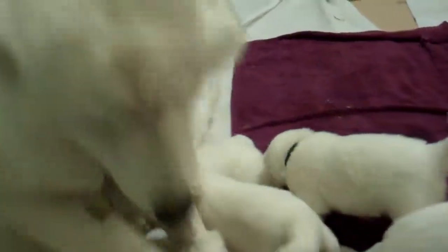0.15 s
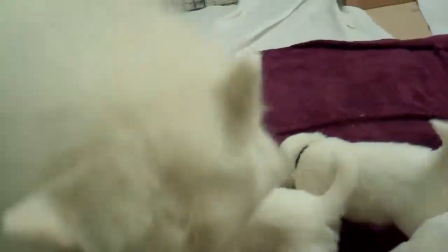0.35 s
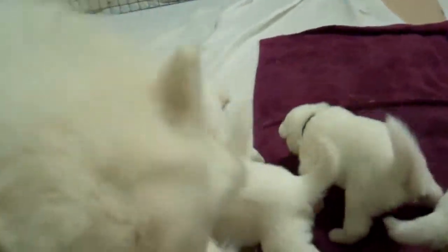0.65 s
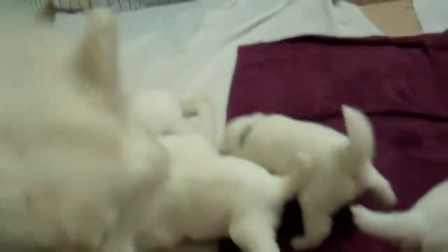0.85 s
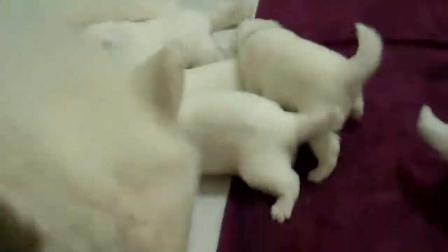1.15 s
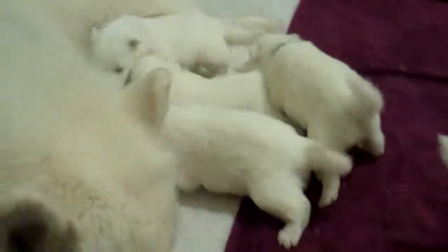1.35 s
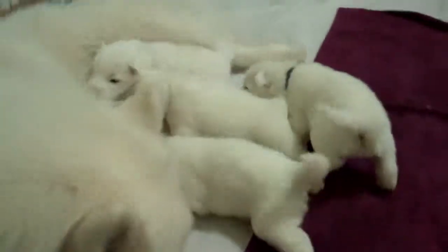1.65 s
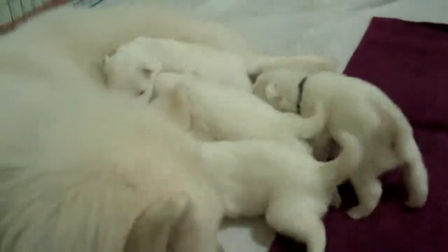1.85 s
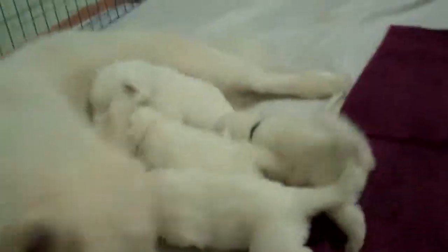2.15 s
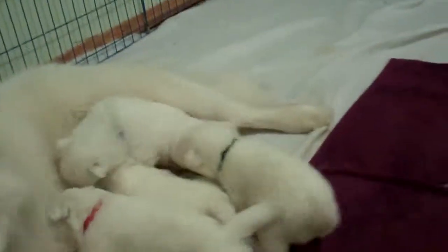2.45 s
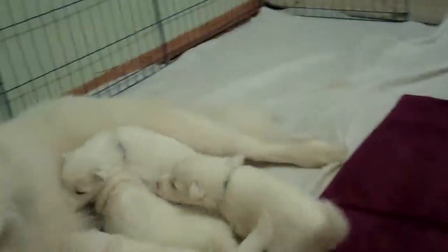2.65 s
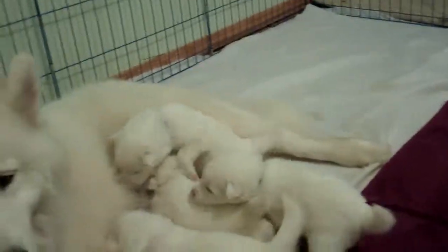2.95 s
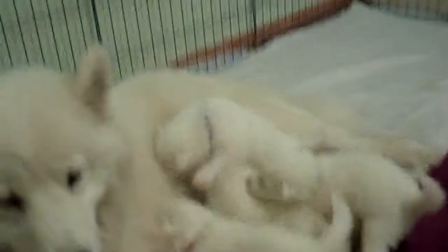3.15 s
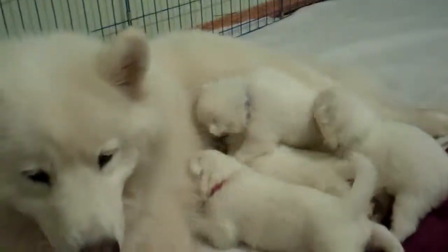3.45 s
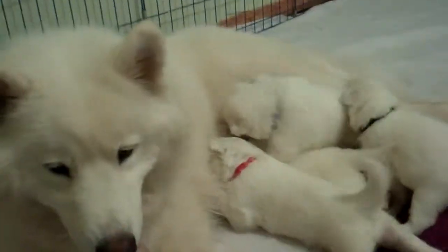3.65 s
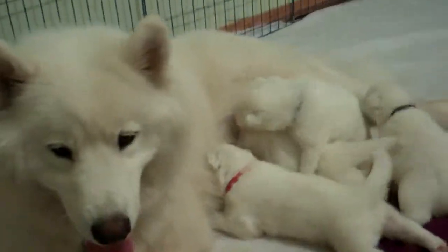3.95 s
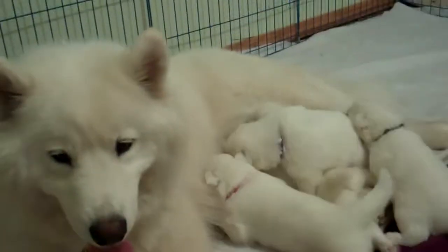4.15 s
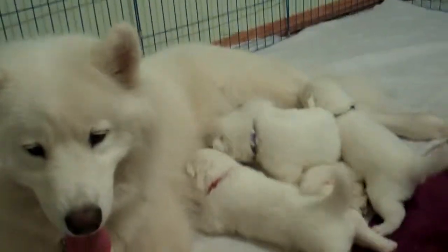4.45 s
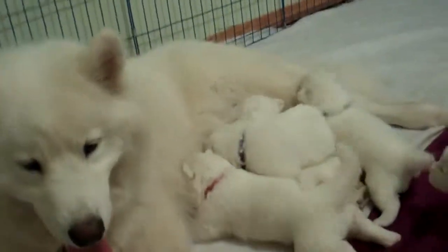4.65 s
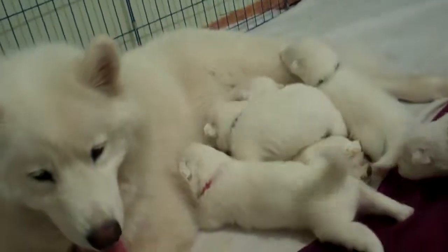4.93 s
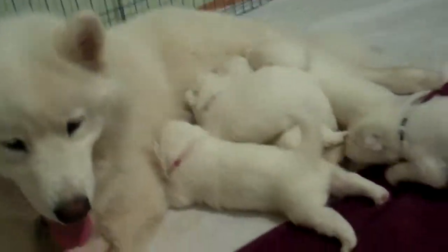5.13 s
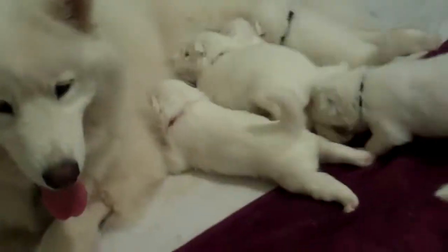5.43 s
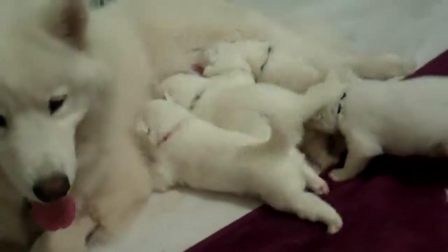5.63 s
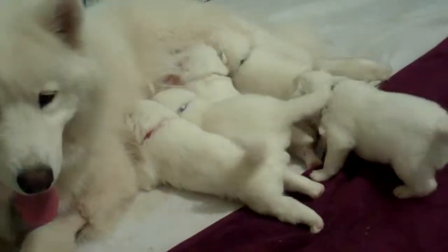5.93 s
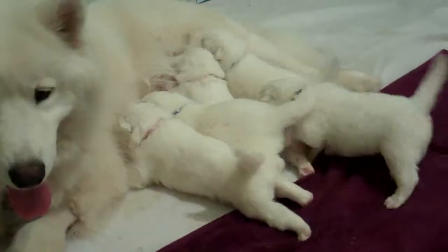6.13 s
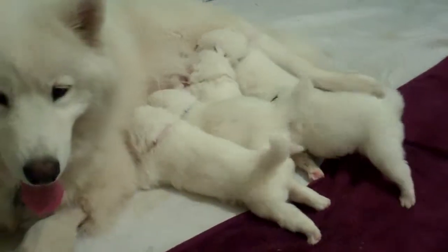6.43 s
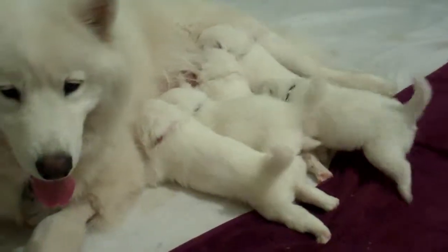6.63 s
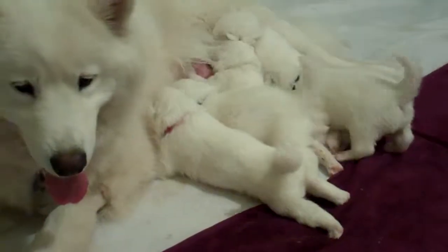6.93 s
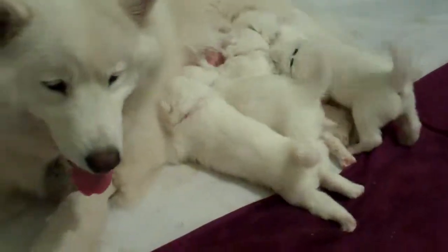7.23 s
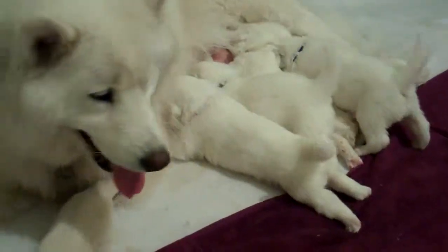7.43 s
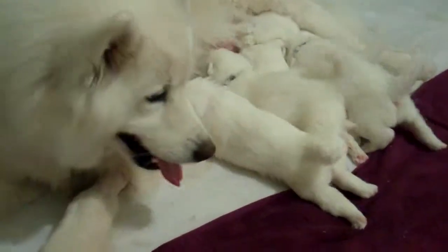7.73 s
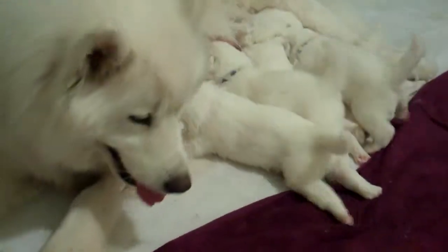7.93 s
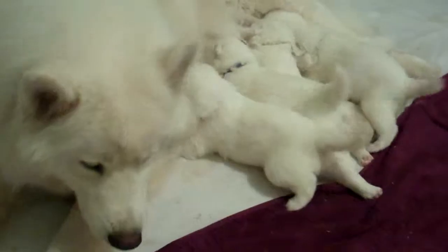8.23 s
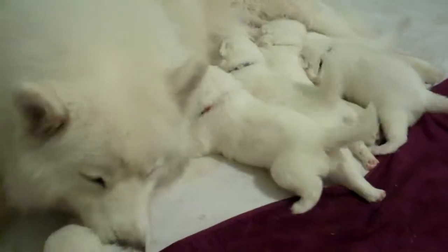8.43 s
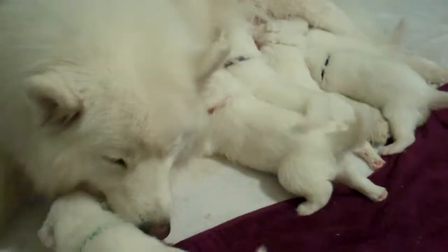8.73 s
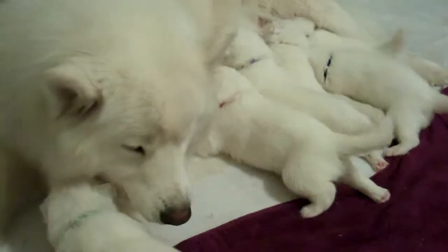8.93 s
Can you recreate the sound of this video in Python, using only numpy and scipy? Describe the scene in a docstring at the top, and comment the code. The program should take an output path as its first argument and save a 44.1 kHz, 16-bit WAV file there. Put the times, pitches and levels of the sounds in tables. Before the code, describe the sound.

A sharp puppy squeal opens, then a soft whimper and a louder, cracking yelp. The middle quietens to bedding rustles, small low grunts, claw ticks and a few metal clinks. After a bump near five seconds, a run of arched squeals follows, then gentle whimpers. Close microphone in a small, bare, slightly echoing room with steady hiss.

```python
"""A puppy's squeal bursts out at once, over a faint stir of bedding and the steady air of a small, bare room.
One pup squeals in quick rising and falling arches; another yelps shrilly; others whimper and grunt.
Voices are harmonic series on pitch arches filtered by a throat; noses whistle as gliding sines.
Bedding, taps and bumps are shaped noise; metal clinks are decaying modes struck by clicks.
A room adds echoes and a diffuse tail, and gain control ducks the loudest cries."""
import sys
import numpy as np
from scipy import signal
from scipy.fft import rfft, irfft, next_fast_len
from scipy.io import wavfile
from scipy.ndimage import uniform_filter1d, map_coordinates

SR = 44100
rng = np.random.default_rng(int(sys.argv[2]) if len(sys.argv) > 2 else 0)


def master(y):
    """Save y as 16-bit WAV."""
    cut = np.clip(np.atleast_2d(y).T, -1, 1)
    pcm = np.round(cut * 32767)  # scale
    wavfile.write(sys.argv[1], SR, pcm.astype(np.int16))


N = 400428
EDGE_HZ = 14350  # upper band limit


def amp(db):
    """Logarithmic level: decibels become an amplitude ratio."""
    return 10 ** (np.asarray(db) / 20)


def unit(x):
    """Power normalisation: scales to rms 1."""
    return x / np.sqrt(np.mean(x ** 2) + 1e-20)


def read(points, hz):
    """Logarithmic frequency scale: interpolates a table along it."""
    f, value = np.transpose(points)
    return np.interp(np.log(hz + 1), np.log(np.abs(f) + 1), value)


def add(mix, s, sound):
    """Superposition: adds a sound to the mix in place, from a time in seconds."""
    part = mix[max(round(s * SR), 0):][:len(sound)]
    part += sound[:len(part)]


def colour(x, points, tilt_db=0):
    """Linear filtering: weights the spectrum by a table and a tilt per octave, then sets rms to 1."""
    hz = np.fft.rfftfreq(len(x), 1 / SR)
    gain = amp(read(points, hz) + tilt_db * np.log2(1 + hz / 500))
    return unit(irfft(rfft(x) * gain, len(x)))


def wander(size, hz):
    """Band-limited random motion: a smooth curve through random knots, two per cycle of the top rate."""
    knots = rng.standard_normal(size // 8 + 4)
    return map_coordinates(knots, [np.arange(size) * 2 * hz / SR], order=2, mode="wrap")


def delay(x, s):
    """Linear phase: a phase slope delays by any fraction of a sample."""
    size = next_fast_len(N + SR // 4)
    hz = np.fft.rfftfreq(size, 1 / SR)
    return irfft(rfft(x, size) * np.exp(-2j * np.pi * hz * s), size)[:N]


# Coherence of a diffuse field at two ports: (f/Hz, left-right likeness 0-1)
LIKENESS = [(60, 1), (130, 0.93), (290, 0.93), (640, 0.86), (1410, 0.66), (2150, 0.045), (15000, 0.018)]


def pair(a, b):
    """Spatial coherence: mixes two unrelated signals into a diffuse field at two close microphone ports."""
    same = np.clip(read(LIKENESS, np.fft.rfftfreq(len(a), 1 / SR)), 0, 1)
    other = same * rfft(a) + np.sqrt(1 - same ** 2) * rfft(b)
    return np.array([a, irfft(other, len(a))])


ARCH_ROUND = 3.5  # how long the pitch lingers at the top before it drops
STRAIN_AT = 0.23  # share of the fall at which the voice is harshest
OPEN_UNTIL = 0.62  # the resonance starts to move this share of the way from full level to top pitch
RELEASE_S = 0.018  # length of the quick final fade


def cry(row, swell, sink_db, hold, pure_db, thin_db, muffle_db, clean, mouth_hz, closing):
    """Vocal effort: one arch governs pitch, level, overtones, roughness and resonance together."""
    (s, rise, fall, start_hz, top_hz, end_hz, steepness, onset_db, attack, db,
     rise_db, fall_db, rough, ring_hz) = row
    length, strain = rise + fall, rise + STRAIN_AT * fall
    t = np.arange(0, length, 20 / SR)

    up, down = np.clip(t / rise, 0, 1), np.clip((t - rise) / fall, 0, 1)
    rising = start_hz + (top_hz - start_hz) * (1 - (1 - up) ** steepness) ** 2
    falling = end_hz + (top_hz - end_hz) * (1 - down ** (ARCH_ROUND / steepness)) ** 1.8
    hz = np.where(t < rise, rising, falling)

    level_db = db + (onset_db - db) * np.interp(t, [0, attack], [1, 0]) ** swell
    level_db -= sink_db * np.interp(t, [attack, length], [0, 1]) ** hold
    level_db -= np.interp(t, [length - RELEASE_S, length], [0, 10])

    # overtones: onset, full rise, top, greatest strain, shutting mouth
    soonest = min(attack, rise)
    overtone_db = np.interp(t, [0, soonest * 0.73, rise, strain, length],
                            [rise_db - pure_db, rise_db, rise_db - thin_db, fall_db, fall_db - muffle_db])
    roughness = rough * np.interp(t, [rise, strain], [clean, 1])
    widest = soonest * (1 - OPEN_UNTIL) + rise * OPEN_UNTIL
    log_focus = np.interp(t, [widest, strain, length], np.log([ring_hz, mouth_hz, mouth_hz * closing]))
    # course columns: t/s, f/Hz, level/dB, overtones/dB, roughness, resonance f/Hz
    return np.transpose([s + t, hz, level_db, overtone_db, roughness, np.exp(log_focus)])


def voice(course, throat, focus_db, jitter, rasp, flutter_db):
    """Source and filter: vocal-fold partials and pulsed air pass a throat; roughness shakes the folds."""
    s, *columns = np.transpose(course)
    t = np.arange(s[0], s[-1], 1 / SR)
    smooth = (uniform_filter1d(np.interp(t, s, c), SR // 160) for c in columns)
    hz, level_db, overtone_db, rough, focus_hz = smooth
    rough = np.clip(rough, 0, 1)
    phase = 2 * np.pi * np.cumsum(hz * (1 + jitter * rough * wander(len(t), 300))) / SR

    k = np.arange(1, 25)[:, None]  # partial number
    # the mouth lifts the partials near its resonance
    focus = focus_db * np.exp(-(np.log(k * hz / focus_hz) / 0.18) ** 2)
    partials = amp(read(throat, k * hz) + focus + overtone_db * (k > 1)) * (k * hz < EDGE_HZ)
    partials /= np.sqrt((partials ** 2).sum(0) / 2)
    # the throat spreads each pulse in time
    folds = (partials * np.cos(k * phase - k ** 2 / 2)).sum(0)
    # strong and weak cycles alternate under strain
    folds *= 1 + rough * wander(len(t), 149.6) * np.cos(phase / 2)

    air = colour(rng.standard_normal(len(t)) * (1 + np.cos(phase)), throat)
    sound = (folds + rasp * rough * air) / np.sqrt(1 + (rasp * rough) ** 2)
    fade = np.clip(np.minimum(t - t[0], t[-1] - t) / 0.0029, 0, 1)
    return s[0], sound * fade * amp(level_db + flutter_db * wander(len(t), 59.4))


# Pitch arches of open-mouthed squeals: (t/s, rise/s, fall/s, start f/Hz, top f/Hz, end f/Hz, steepness,
#   onset level/dB, attack/s, full level/dB, rise overtones/dB, fall overtones/dB, roughness 0-1, resonance f/Hz)
# Steepness 1.5 is a gentle bell, 5 a leap to a long top and a sudden drop. Levels are before the room.
SQUEALS = [ (0, .043, 0.083, 926, 1412, 599, 1.71, -33.5, 0.044, -15, -1.5, 9.5, 0.44, 2390),
           (2.674, .012, 0.056, 906, 900, 820, 2, -50, 0.018, -48, -1, 3, 0.56, 2900),
           (2.975, .01, .06, 874, 872, 800, 1.8, -53, .02, -52, 14, 14, .55, 3400),
           (3.28, 0.011, 0.061, 914, 900, 835, 1.9, -56, 0.028, -55, 16, 16, 0.5, 3500),
           (5.772, 0.081, 0.11, 782, 1405, 511, 2.29, -26, 0.095, -15.5, -14.5, 6, 0.2, 10900),
           (6.352, .106, .095, 922, 1596, 597, 3.8, -38.5, 0.047, -14.5, -0.5, 10.5, 0.09, 8200),
           (6.713, 0.13, 0.096, 891, 1696, 690, 4.35, -37.5, .045, -16.5, 0, 12, 0.05, 8000),
           (7.119, .084, .16, 919.4, 1559, 493, 2.69, -29.5, 0.038, -17.5, 3.5, 8, 0.41, 7200)]
# Open-mouth throat response: (f/Hz, level/dB)
OPEN_MOUTH = [(130, -46), (300, -47), (700, -2), (1300, -3), (1800, 1), (2450, -4.5), (3000, -19),
              (3500, -22.5), (4700, -6.5), (6100, -17.5), (8200, -13), (10500, -25), (12500, -27),
              (14500, -73)]


def squeals():
    """Spectral growth under strain: most open-mouthed cries gain overtones and harshness as they fall."""
    out = np.zeros(N)
    for row in SQUEALS:
        course = cry(row, swell=1.1, sink_db=16.5, hold=1.0, pure_db=18, thin_db=1.5, muffle_db=22.5,
                     clean=0.25, mouth_hz=2300, closing=0.79)
        add(out, *voice(course, OPEN_MOUTH, focus_db=4.0, jitter=0.113, rasp=0.29, flutter_db=4))
    return out


# Spectrum of the room's air: (f/Hz, level/dB)
AIR = [(15, -43), (25, -27), (59, -3), (117, -4), (170, -7), (267, -3.5), (420, -11), (818, -7),
       (910, -9.5), (1590, -14), (3350, -14.5), (5560, -15.5), (11700, -16), (13400, -11), (14500, -18)]
AIR_DB = -47.5


def room_air():
    """Stationary noise: steady rumble and hiss form a diffuse field."""
    return amp(AIR_DB) * pair(*(colour(z, AIR) for z in rng.standard_normal((2, N))))


# Strokes of paws and fur over the bedding: (middle t/s, length/s, level/dB before the mix gain,
#   extra hiss of a quick stroke/dB)
STROKES = [(0.496, 0.26, -40, -1.5), (1.114, .15, -35, -20), (1.38, 0.19, -46, -3.5),
           (1.566, 0.6, -45, -0.5), (1.767, .24, -43.5, 7.5), (1.904, 0.2, -51, 9.5),
           (2.375, 0.36, -43, -1), (2.47, 0.36, -43.5, -0.5), (2.72, 0.35, -45.5, -7),
           (2.855, 0.32, -44.5, 1), (2.999, 0.28, -41, -4.5), (3.167, 0.087, -43, -1),
           (3.542, 0.35, -53, -10), (3.767, 0.047, -53, 6), (3.913, 0.22, -51.5, 8), (4.224, 0.3, -45, -18),
           (4.31, 0.24, -48.5, 8), (4.637, 0.4, -51, -18), (4.89, 0.12, -49, 9.5), (5.08, 0.18, -41, 7),
           (5.55, 0.85, -44.5, -8), (8.12, 0.39, -53.5, 7.5), (8.345, 0.5, -53, -6), (8.94, 0.19, -42, 5)]
# Spectrum of rubbed cloth: (f/Hz, level/dB)
CLOTH = [(80, -52), (170, -16.5), (290, -1.5), (420, -7), (900, -7), (1600, -9.5), (3200, -10), (5200, -14),
         (9000, -10.5), (12000, -8.5), (13700, -3.5), (14500, -20)]
STIR_DB, STIR_HISS_DB = -52, -3.5  # before the mix gain; the litter never lies quite still


def bedding():
    """Stick-slip friction: fibres catch and slip in clumps, a soft hiss with tiny snaps in it."""
    body_power = np.full(N, amp(STIR_DB) ** 2)
    hiss_power = np.full(N, amp(STIR_DB + STIR_HISS_DB) ** 2)
    for middle, length, db, hiss_db in STROKES:
        speed = np.hanning(round(length * SR))  # each stroke swells and fades
        add(body_power, middle - length / 2, (amp(db) * speed) ** 2)
        add(hiss_power, middle - length / 2, (amp(db + hiss_db) * speed) ** 2)

    snap_now = rng.random(N) < 350 / SR  # about 350 snaps a second
    snaps = snap_now * rng.standard_normal(N) * amp(2.0 * np.minimum(rng.exponential(1, N), 4))
    rub = colour(rng.standard_normal(N) + 0.58 * unit(snaps), CLOTH)
    body = signal.sosfiltfilt(signal.butter(2, 3500, fs=SR, output="sos"), rub)
    hiss = rub - body
    clumps = amp(2.8 * wander(N, 23))
    return clumps * (np.sqrt(body_power) * body + np.sqrt(hiss_power) * hiss)


# Nasal grunts: (t/s, length/s, nominal f/Hz, peak level/dB before the room, roughness 0-1)
GRUNTS = [(0.185, 0.033, 530, -35.5, 0.34), (0.221, 0.094, 347.2, -33, 0.67), (1.823, 0.069, 330, -42, 0.6),
          (2.699, 0.069, 268.6, -38.5, 0.2), (3.7, .04, 270, -48.5, 0.45), (3.901, 0.063, 326.4, -33, 0),
          (4.12, 0.057, 282.4, -39.5, 0.37), (4.335, 0.037, 275.5, -39.5, 0.36),
          (4.515, 0.075, 301.5, -37.5, 0.27), (4.946, 0.08, 305, -36.5, 0.3),
          (5.176, 0.037, 288, -38, 0.23), (5.364, 0.089, 265, -43.5, 0.54),
          (5.481, 0.052, 365.5, -41.5, 0.54), (5.569, 0.063, 398, -33, 0.21),
          (6.144, 0.14, 401.4, -38, 0.33)]
# Nasal tract response: (f/Hz, level/dB)
NOSE = [(120, -25), (290, 1.5), (480, -22.5), (650, -8.5), (900, -5), (1300, -23.5), (2500, -33),
        (6000, -49), (14000, -22)]


def grunts():
    """Nasal resonance: short low notes swell and sag through the nose."""
    out, nose_hz = np.zeros(N), 920
    for s, length, hz, db, rough in GRUNTS:
        arch = [(s, hz * 0.9, db - 6.0, 0, rough, nose_hz),
                (s + length * 0.386, hz * 1.01, db, 0, rough, nose_hz),
                (s + length, hz * .96, db - 8.5, -3, rough, nose_hz)]
        add(out, *voice(arch, NOSE, focus_db=2, jitter=.15, rasp=1.2, flutter_db=1.5))
    return out


# Thin whistles through the nose: (t/s, length/s, start f/Hz, end f/Hz, level/dB before the room)
WHISTLES = [(.221, .016, 11430, 12000, -34), (0.449, 0.014, 12250, 12950, -27)]


def whistles():
    """Frequency glide: air through a nose sounds as very high, brief sines that slide upward."""
    out = np.zeros(N)
    for s, length, start_hz, end_hz, db in WHISTLES:
        hz = np.linspace(start_hz, end_hz, round(length * SR))
        tone = np.sin(2 * np.pi * np.cumsum(hz) / SR)
        add(out, s, amp(db) * np.hanning(len(hz)) * tone)
    return out


# Metal clinks: (t/s, level/dB before the mix gain, mode tilt/dB per octave, contact click level/dB)
CLINKS = [(.308, -19, 6, -11), (.38, -40, -12, -9), (.407, -35, 31, -35), (.571, -39.5, -27, -20),
          (.608, -32.5, 41, 1.5), (1.012, -48, -24, -20), (1.197, -26, 24, 0), (1.489, -24.5, 5, -5.5),
          (2.524, -51, 17, 2), (2.576, -39, 40, -1), (7.812, -30, 21, -6), (8.387, -44, -10, 10.5)]
# Modes of a small metal piece: (f/Hz, level/dB before tilt, t60/s)
METAL = [(3600, -17, 0.047), (5440, -18, 0.096), (6840, -24, 0.067), (9670, 6, 0.068), (11900, -18, .05),
         (13780, 4.5, 0.054)]
# Pings of a pen wire: (t/s, level/dB before the mix gain, mode tilt/dB per octave, contact click level/dB)
WIRE_PINGS = [(5.197, -24.5, 6.6, -7), (5.477, -37, 17, 11)]
# Modes of the pen wire: (f/Hz, level/dB before tilt, t60/s)
WIRE = [(5700, -11, .04), (6660, -6, 0.032), (7630, -6.5, 0.16), (12600, 2.5, 0.047)]
# Spectrum of a dry contact, for clicks and taps: (f/Hz, level/dB before tilt)
TAP_COLOUR = [(150, -10), (700, -1), (1600, 2), (3000, -7.5), (6000, -4), (14000, -4)]


def metal(hits, modes):
    """Modal vibration: each contact is a tiny click that rings the decaying modes of a metal piece."""
    out, t = np.zeros(N), np.arange(SR // 3) / SR
    for s, db, tilt_db, click_db in hits:
        ring = np.zeros(len(t))
        for hz, mode_db, t60 in modes:
            tilt = np.clip(tilt_db * np.log2(hz / 11500), -40, 6)
            ring += amp(mode_db + tilt - 60 * t / t60) * np.sin(2 * np.pi * hz * t)
        click = colour(rng.standard_normal(len(t)), TAP_COLOUR, tilt_db=4) * amp(click_db - 60 * t / 0.065)
        onset = 1 - np.exp(-t / 0.00021)
        add(out, s, amp(db) * (ring + click) * onset)
    return out


# Closed-mouth whimpers: (t/s, rise/s, fall/s, start f/Hz, top f/Hz, end f/Hz, steepness, onset level/dB,
#   attack/s, full level/dB, rise overtones/dB, fall overtones/dB, roughness 0-1, resonance f/Hz)
WHIMPERS = [ (.456, 0.0059, .12, 978, 963, 560, 3.65, -32, 0.033, -25.5, 0, -16, 0.66, 1430),
            (4.7, .052, 0.0806, 401, 746, 711.4, 2.78, -41, 0.046, -24, -9.5, -1, .2, 1470),
            (6.131, 0.013, .035, 798, 845, 769, 2.5, -38, 0.014, -27.5, 2, 5, 0.13, 850),
            (7.547, 0.0034, 0.047, 714, 704, 540, 5.9, -44, 0.0036, -29.5, -1, -0.5, 0.24, 600),
            (7.755, 0.041, 0.1, 859, 1073, 667.5, 2.49, -32, 0.11, -20, -1, 5.5, 0.087, 2000),
            (8.099, 0.0516, 0.053, 595.5, 617, 575, 1.96, -36.5, 0.045, -28.5, -5.5, -4.5, 0.27, 1213),
            (8.47, 0.038, .066, 1183, 1163, 948, 3.1, -40.5, 0.096, -24.5, 6, 2, 0.039, 11200),
            (8.787, 0.0032, 0.09, 1320, 1299, 864, 6.4, -44, 0.036, -23, -8, 2, 0.1, 11000)]
# Closed-mouth throat response: (f/Hz, level/dB)
SHUT_MOUTH = [(100, -42), (270, -12), (600, 0), (1000, 0), (1500, -11), (1900, -16), (2300, -29),
              (3000, -38), (6000, -40), (8000, -36), (9700, -27), (12000, -28), (14500, -40)]


def whimpers():
    """Low-pass radiation: a shut mouth leaves soft whines few overtones, and its resonance hardly moves."""
    out = np.zeros(N)
    for row in WHIMPERS:
        course = cry(row, swell=1.08, sink_db=12.5, hold=1.12, pure_db=-1, thin_db=-2.5, muffle_db=7.5,
                     clean=0.82, mouth_hz=row[-1], closing=0.93)
        add(out, *voice(course, SHUT_MOUTH, focus_db=5.5, jitter=0.1995, rasp=0.58, flutter_db=2.0))
    return out


# Claw taps and mouth smacks: (t/s, level/dB before the mix gain, tilt/dB per octave, t60/s)
TAPS = [(0.6, -29, -1, 0.021), (1.07, -38.5, -6.5, 0.15), (1.16, -26, 1, 0.025), (1.217, -16, -1, 0.017),
        (1.623, -34, -2, 0.013), (1.709, -31.5, 7, 0.045), (1.842, -35, 1, 0.014),
        (2.195, -38.5, -14, 0.044), (3.122, -29.5, -0.5, 0.012), (3.346, -33, 4, 0.017),
        (3.475, -24.5, 15, 0.26), (3.971, -33, 8, .025), (4.033, -36, 4, .025), (4.087, -37, 2, .015),
        (4.226, -23.5, 6, 0.02), (4.245, -49, -11, 0.037), (5.064, -17, 8, 0.032), (5.073, -36, 11, .06),
        (5.477, -30.5, 1.5, 0.1), (5.684, -31, 1.5, 0.047), (6.009, -24, 2.5, 0.044),
        (6.13, -29.5, -2.5, 0.037), (6.278, -19, 1, 0.022), (7.041, -30, -3, 0.017),
        (8.286, -32.5, -0.5, .04), (8.307, -30, 1, 0.043), (8.707, -35, 0.5, 0.024)]


def taps():
    """Impulsive excitation: short noise bursts decay exponentially, mostly as dry ticks."""
    out, t = np.zeros(N), np.arange(SR // 6) / SR
    for s, db, tilt_db, t60 in TAPS:
        tick = colour(rng.standard_normal(len(t)), TAP_COLOUR, tilt_db)
        add(out, s, tick * amp(db - 60 * t / t60))
    return out


# Another pup's shrill yelp: (t/s, rise/s, fall/s, start f/Hz, top f/Hz, end f/Hz, steepness, onset level/dB,
#   attack/s, full level/dB, rise overtones/dB, fall overtones/dB, roughness 0-1, resonance f/Hz)
YELP = [(.706, 0.051, .1, 746, 1215, 661.4, 1.7, -23, 0.043, -12.5, -5, 19.5, 0.29, 3630)]
# Throat response of the shrill cry: (f/Hz, level/dB)
SHRILL_MOUTH = [(130, -37), (300, -19), (750, -9), (1200, 4.5), (1900, -4), (2400, -10), (3050, -16),
                (3600, -16), (4900, -10.5), (6800, -12.5), (8500, -17.5), (12500, -24), (14500, -30)]
CRACK_S, CRACK_WIDTH_S = .744, 0.0047  # the voice cracks just before the top
CRACK_ROUGH, CRACK_DB = 0.45, 19  # added roughness; jump of the overtones


def yelp():
    """Register break: a nearly pure tone cracks on the way up, then turns shrill."""
    out = np.zeros(N)
    for row in YELP:
        course = cry(row, swell=2.2, sink_db=18.5, hold=0.69, pure_db=5, thin_db=-13, muffle_db=34,
                     clean=0.26, mouth_hz=5300, closing=0.7)
        s, hz, level_db, overtone_db, rough, focus_hz = course.T
        since = (s - CRACK_S) / CRACK_WIDTH_S
        overtone_db = overtone_db - CRACK_DB * np.interp(since, [-1, 0], [1, 0])
        rough = rough + CRACK_ROUGH * np.exp(-since ** 2)
        cracked = np.transpose([s, hz, level_db, overtone_db, rough, focus_hz])
        add(out, *voice(cracked, SHRILL_MOUTH, focus_db=11.5, jitter=0.141, rasp=1.0, flutter_db=3))
    return out


# Paws and bodies landing on the floor: (t/s, level/dB before the room, t60/s)
BUMPS = [(1.841, -34.5, 0.1), (1.992, -37, 0.13), (2.711, -29.5, 0.078), (5.025, -23.5, 0.33),
         (5.063, -23.5, 0.21), (5.098, -32.5, 0.44)]
# Spectrum of the covered floor: (f/Hz, level/dB)
BUMP_COLOUR = [(40, -37), (100, -18), (160, -4), (240, 1), (330, -2), (480, -3), (620, -8), (1050, -10),
               (1600, -17), (2400, -19), (4400, -32), (8000, -27), (12000, -35)]


def bumps():
    """Damped impact: the covered floor answers a blow with dull, decaying noise."""
    out, t = np.zeros(N), np.arange(SR // 2) / SR
    for s, db, t60 in BUMPS:
        thud = colour(rng.standard_normal(len(t)), BUMP_COLOUR)
        onset = 1 - np.exp(-t / 0.0027)
        add(out, s, thud * amp(db - 60 * t / t60) * onset)
    return out


# Near walls and floor: (delay t/s, level/dB against the direct sound)
ECHOES = [(.0043, -23.5), (.0079, -18), (0.0127, -20), (0.0182, -11.5)]
# Reverberation time of the tail: (f/Hz, t60/s)
ROOM_T60 = [(200, 0.84), (800, 0.44), (1600, 0.51), (4000, 0.33), (8000, 0.25), (14000, 0.29)]
# Strength of the tail before the wet gain: (f/Hz, level/dB)
ROOM_DB = [(200, -5), (800, -4), (1600, -4), (4000, -2), (8000, -3), (14000, -2)]


def room(x, wet_db, lag_ms):
    """Reverberation: direct sound, a few near echoes, and a diffuse tail that dies band by band."""
    near = x + sum(amp(db) * delay(x, s) for s, db in ECHOES)
    direct = np.array([delay(near, lag_ms / 1000), near])  # a positive lag reaches the right port first

    scatter = pair(*(rng.standard_normal((2, SR)) * (rng.random((2, SR)) < .15)))
    hz, t, z = signal.stft(unit(scatter), SR, nperseg=256)
    t60 = np.maximum(read(ROOM_T60, hz), .05)[:, None]
    decay = amp(read(ROOM_DB, hz)[:, None] - 60 * t / t60)
    z = z * decay * np.sqrt(2 * np.log(1000) / (t60 * SR))  # equal energy whatever the t60
    tail = signal.istft(z, SR, nperseg=256)[1]
    tail *= np.clip(np.arange(tail.shape[1]) / SR / 0.0014, 0, 1)
    return direct + amp(wet_db) * signal.fftconvolve(x[None], tail, axes=1)[:, :N]


def scene():
    """Interaural cues: the squeals and yelp come from a little to the right, grunts and bumps from a
    little to the left, the rest nearly straight ahead."""
    loud = room(squeals() + yelp(), wet_db=3.0, lag_ms=0.092) * amp([[-1], [0]])
    low = room(grunts() + bumps(), wet_db=-2.5, lag_ms=-.07)
    thin = room(whistles(), wet_db=-8, lag_ms=0)
    contacts = bedding() + metal(CLINKS, METAL) + metal(WIRE_PINGS, WIRE) + taps()
    small = room(contacts, wet_db=-3.5, lag_ms=-0.021) * amp(0.5)
    soft = room(whimpers(), wet_db=0.5, lag_ms=-0.026) * amp([[.7], [1]])
    return loud + room_air() + low + thin + small + soft


def record(dry):
    """Dynamic compression: gain control ducks the loudest cries and recovers slowly; then the band limit."""
    power = np.abs(uniform_filter1d((dry ** 2).mean(0), SR // 100))
    power_db = 10 * np.log10(power + 1e-12)
    recovery = np.arange(N) / SR * 9  # the held peak falls 9 dB per second
    held_db = np.maximum.accumulate(power_db + recovery) - recovery
    over_db = np.maximum(held_db + 16.5, 0)  # excess above -16.5 dB
    ducked = dry * amp(-.4 * uniform_filter1d(over_db, SR // 200))
    low_pass = signal.firwin(301, EDGE_HZ, window=("kaiser", 8), fs=SR)
    return signal.oaconvolve(ducked, low_pass[None], "same")


dry = scene()
out = record(dry)
master(out)
```